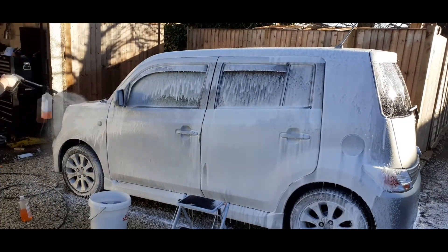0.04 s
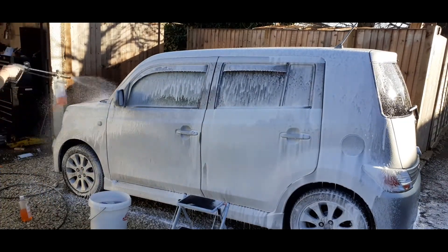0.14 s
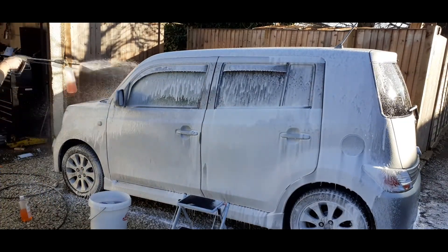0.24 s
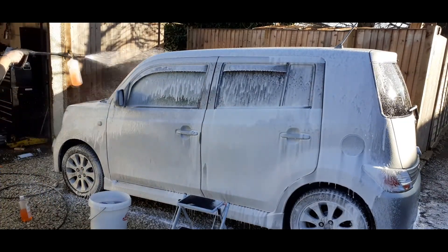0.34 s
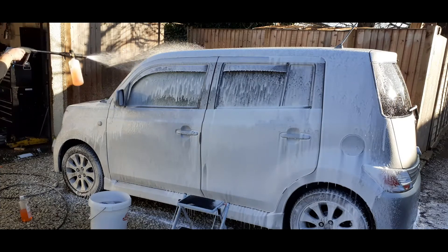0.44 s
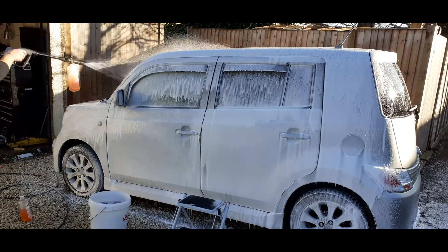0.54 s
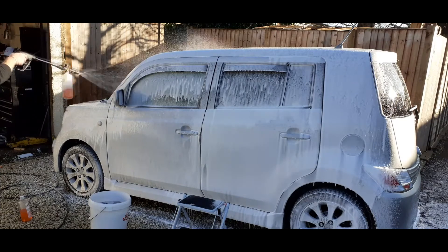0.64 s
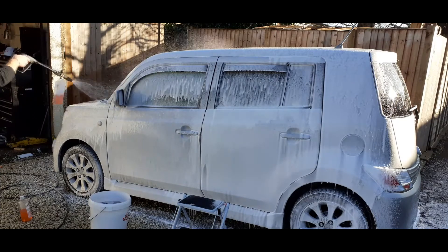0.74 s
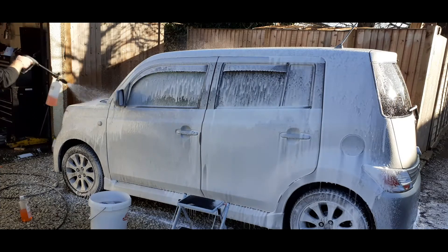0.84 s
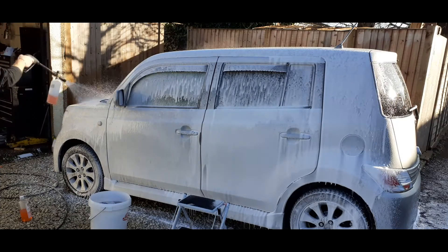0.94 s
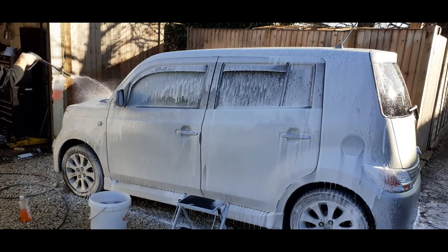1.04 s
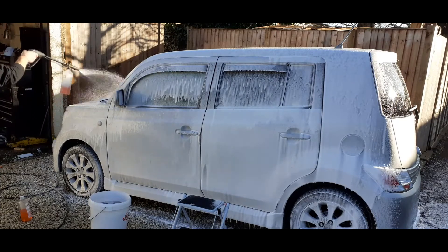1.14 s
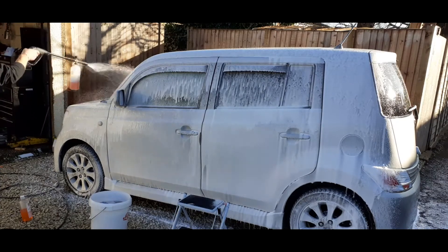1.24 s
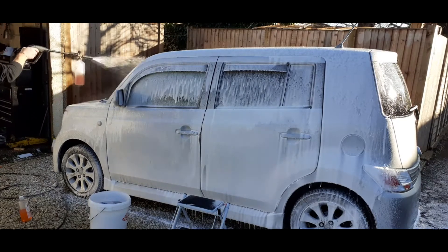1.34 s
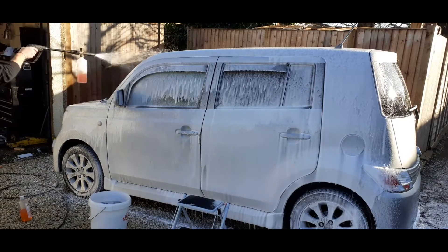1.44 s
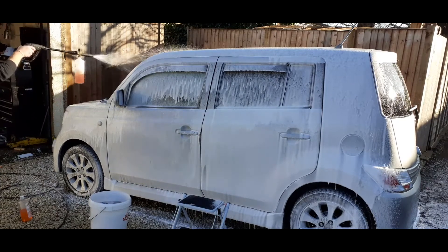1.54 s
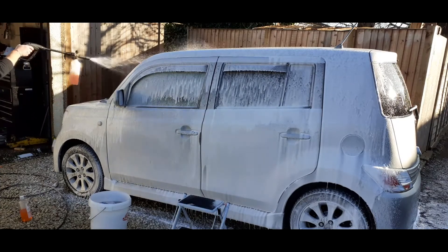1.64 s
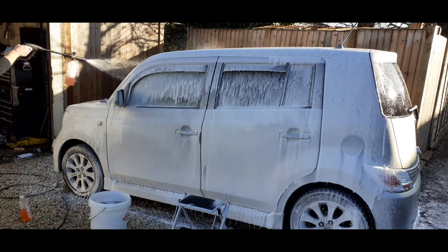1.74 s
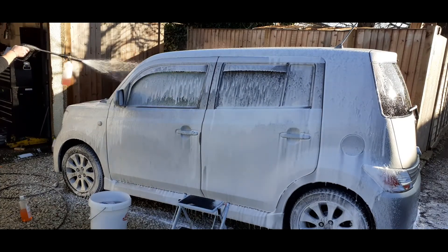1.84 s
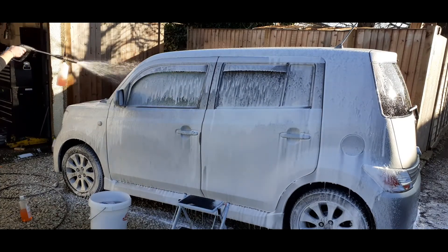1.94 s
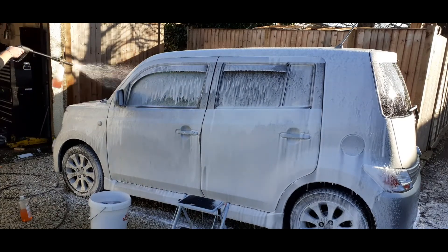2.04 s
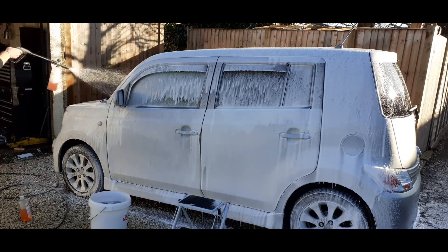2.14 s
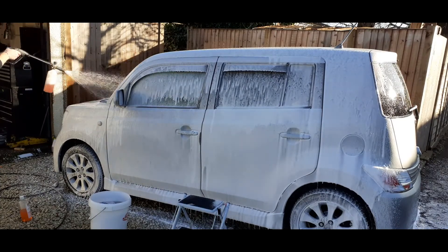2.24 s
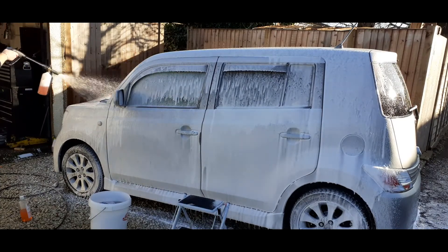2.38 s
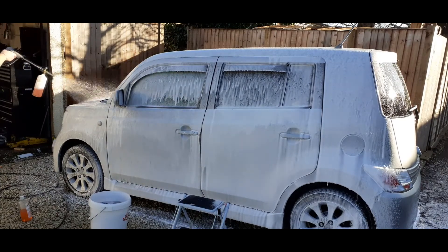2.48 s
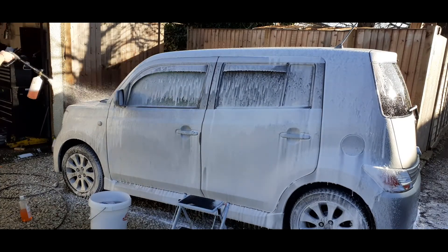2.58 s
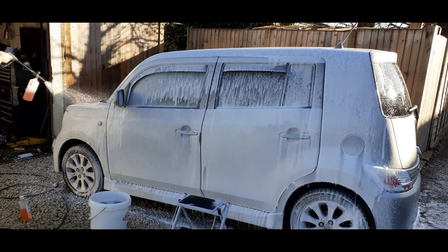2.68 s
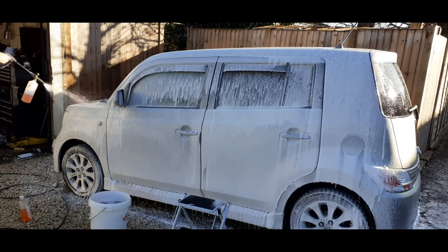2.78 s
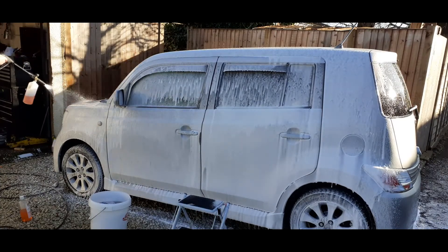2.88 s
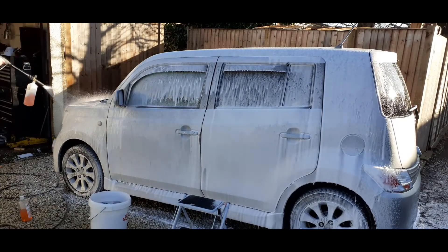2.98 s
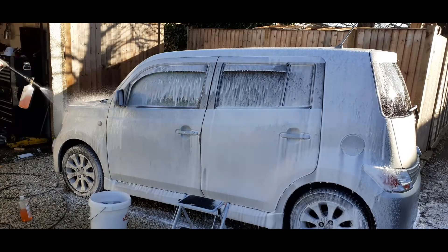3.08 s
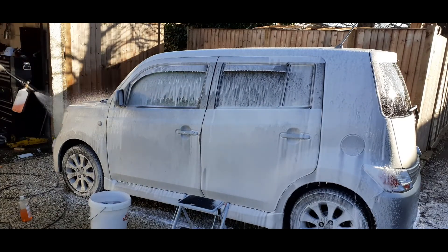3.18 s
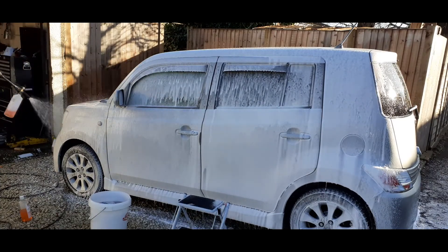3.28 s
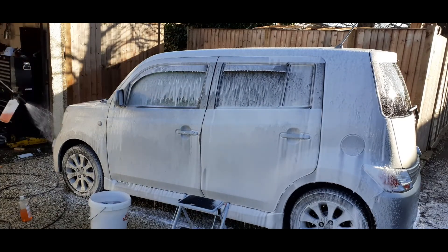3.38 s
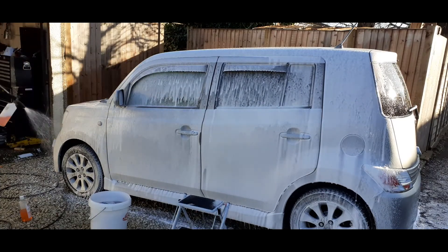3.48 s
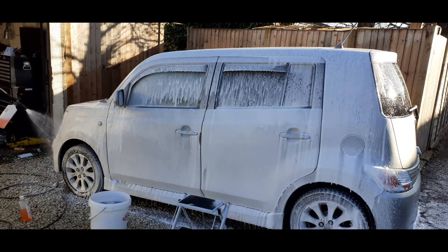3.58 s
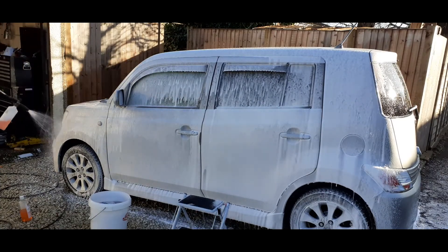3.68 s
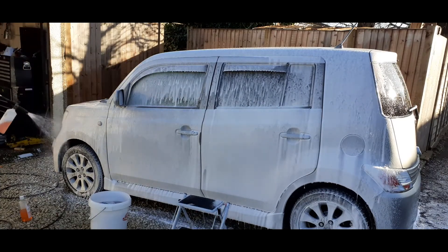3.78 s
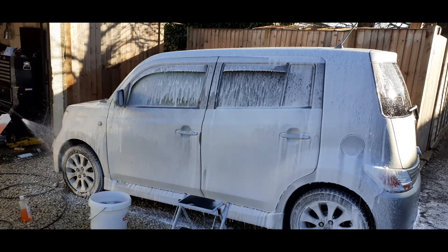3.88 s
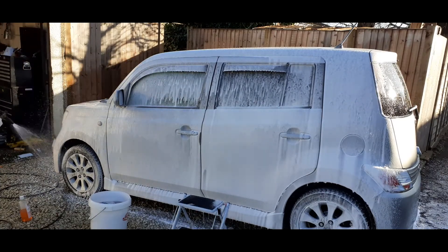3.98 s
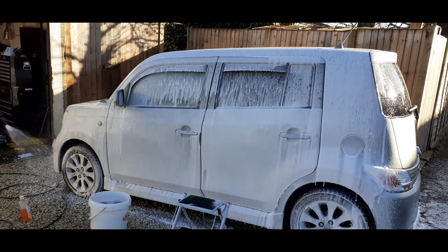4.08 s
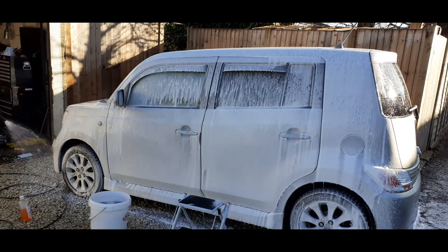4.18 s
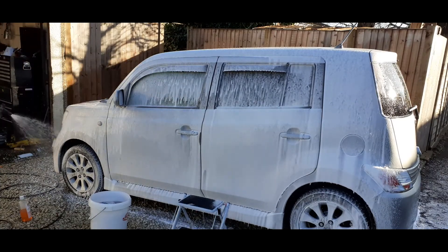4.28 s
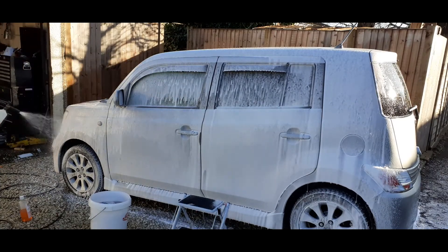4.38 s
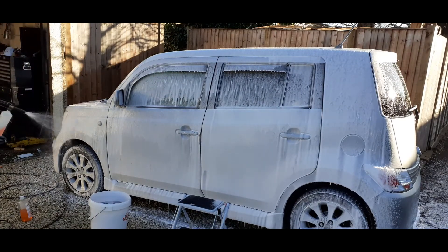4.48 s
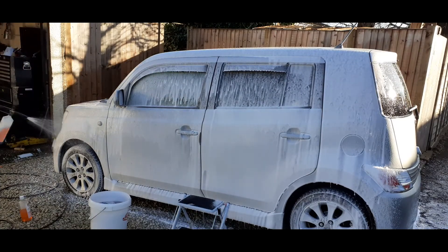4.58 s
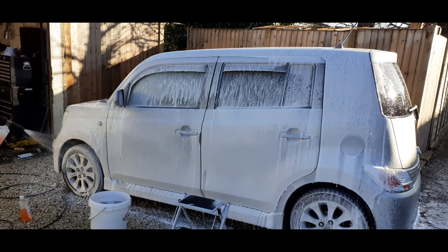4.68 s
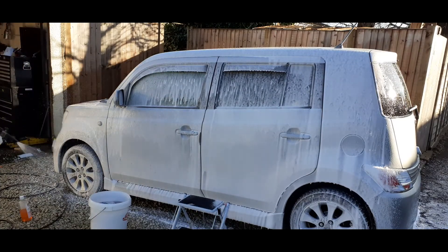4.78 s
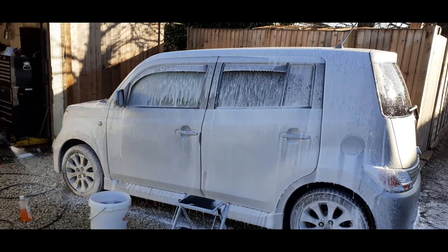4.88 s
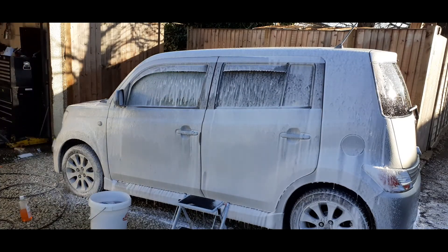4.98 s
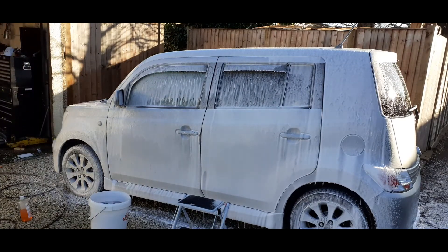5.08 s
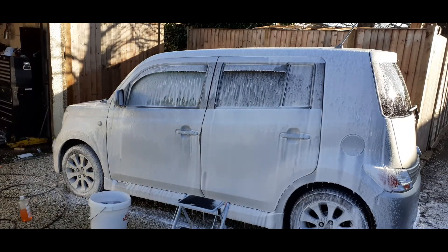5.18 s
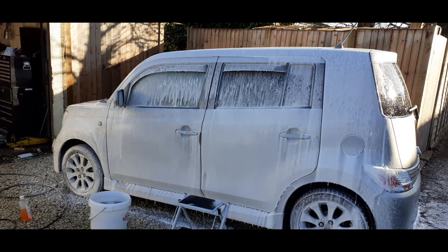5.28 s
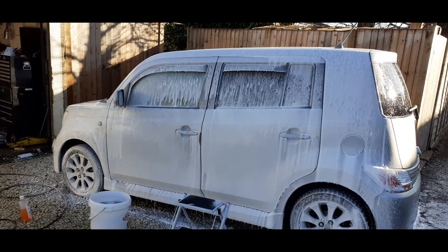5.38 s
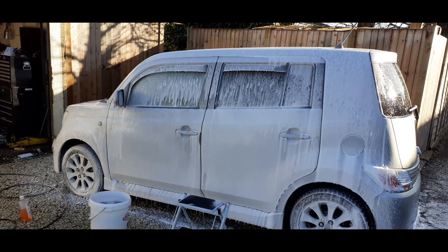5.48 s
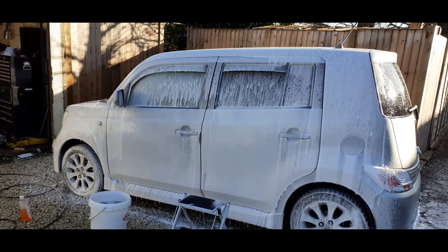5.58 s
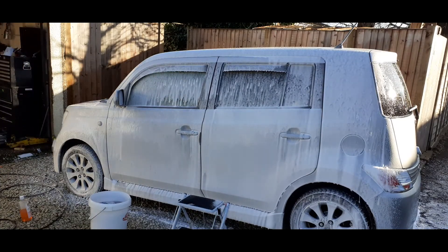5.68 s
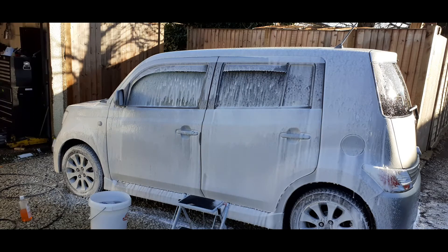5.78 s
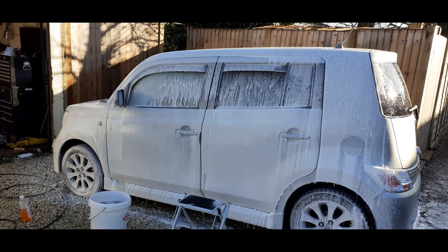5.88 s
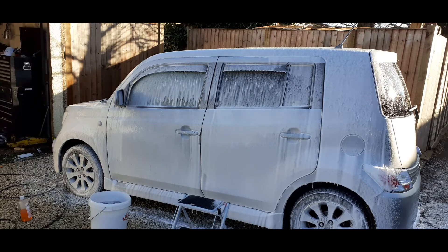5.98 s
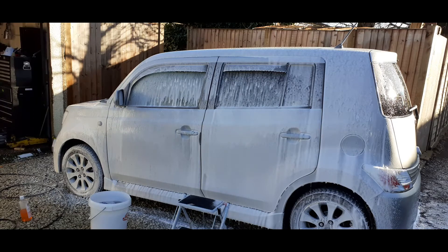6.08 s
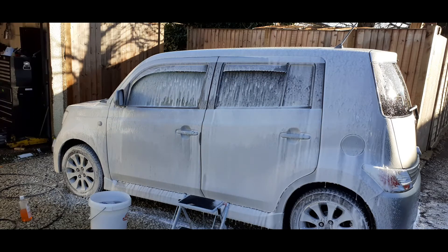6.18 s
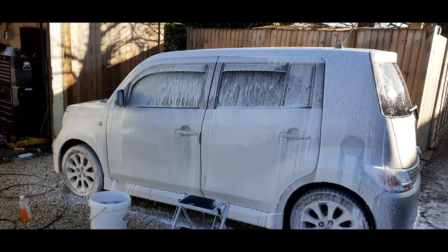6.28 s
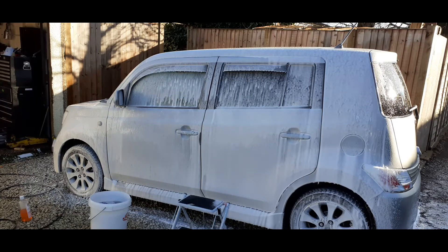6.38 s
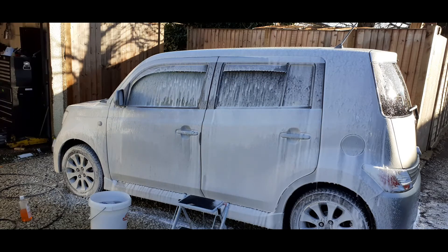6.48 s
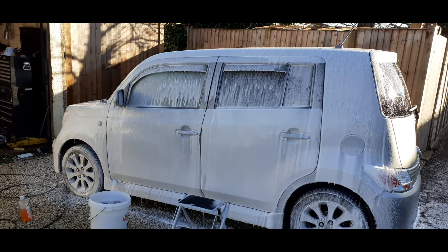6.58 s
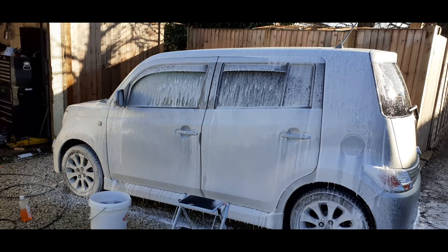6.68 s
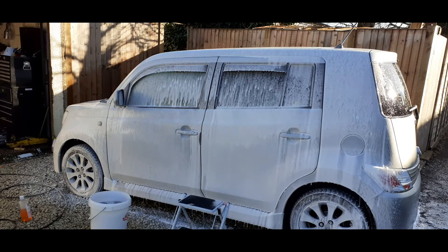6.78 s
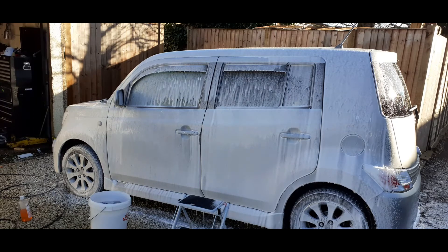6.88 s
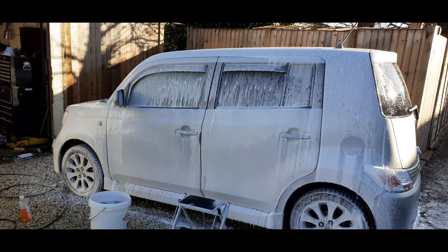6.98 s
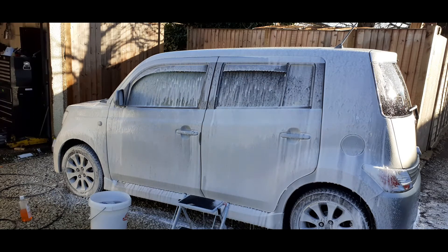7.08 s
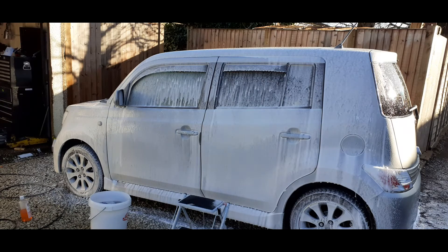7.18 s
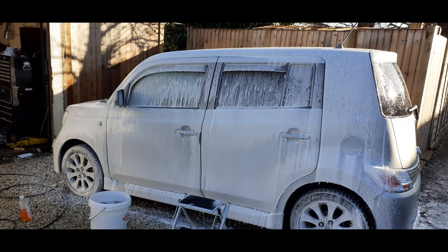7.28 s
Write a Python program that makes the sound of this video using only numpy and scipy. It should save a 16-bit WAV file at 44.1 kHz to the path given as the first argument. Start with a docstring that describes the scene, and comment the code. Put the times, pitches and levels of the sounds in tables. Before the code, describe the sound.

A foam jet rushes and sizzles against a car, drops drumming on the metal over the throbbing hum of a pressure washer. The hiss shifts in tone as the spray moves about. Then the pump stops with a soft thud and the hose empties with a brief falling whistle. In the quiet yard, feet scuff gravel and the spray wand clacks over a low breeze and far-off town wash, all heard a little left of the microphone.

```python
"""Pressure washing a car

In a fenced yard a pump drones while a jet of foam hisses and drums on a car's panels.
The trigger is let go, the motor stops and the last pressure leaves with a sinking whistle.
That leaves a distant town, a little wind, scuffs on gravel and clacks from the lance (the spray wand)."""
import sys
import numpy as np
from scipy import signal
from scipy.fft import rfft, irfft, next_fast_len
from scipy.io import wavfile

SR = 44100
rng = np.random.default_rng(int(sys.argv[2]) if len(sys.argv) > 2 else 0)


def dump(signal):
    """Clip the signal to [-1, 1] and save it as 16-bit WAV at the path in sys.argv[1]."""
    limited = np.clip(np.atleast_2d(signal).T, -1, 1)
    pcm = np.round(limited * 32767).astype(np.int16)
    wavfile.write(sys.argv[1], SR, pcm)


N = 323234
T = np.arange(N) / SR
FFT_SIZE = next_fast_len(N, True)
HZ = np.maximum(np.arange(FFT_SIZE // 2 + 1) * SR / FFT_SIZE, 1)

RELEASE_S, COLLAPSE_DB_PER_S = 4.95, 120  # the trigger is let go and the jet collapses
EMPTYING_S = 5.11  # the hose starts to empty through the nozzle
DRY_S, DRY_DB_PER_S = 5.493, 111  # the hose runs dry
UNSTEADY_HZ = 6.1  # how quickly the flow wavers
EAR_LAG_S = 0.00018  # sound from the left reaches the right ear this much later

# The jet's middle rush, high hiss and top sizzle. Columns: pitch_hz, relative_db
RUSH_SPECTRUM = [(700, -16), (1200, -8), (1500, -5), (1900, -0.5), (2250, -1), (2650, -2.5), (3200, -4),
                 (4500, -66)]
HISS_SPECTRUM = [(1800, -28.5), (2700, -10), (3300, 0), (4300, -0.5), (5200, 0.5), (6100, 1), (7200, -0.5),
                 (8200, -5.5), (9100, -12), (11000, -8), (15500, -51)]
SIZZLE_SPECTRUM = [(5500, -24), (7500, 2), (8300, 0.5), (9200, -7.5), (10500, -2), (12500, 1), (14000, 0.5),
                   (15800, -5.5)]

def spray():
    """The jet rushes and hisses, and sizzles most when the nozzle faces the listener."""
    rush_gain = jet_gain(full_db=-35.5, facing_share=0.07, emptying_db=-48.5, waver_db=1.5)
    rush = reflect(noise(RUSH_SPECTRUM), delay_s=0.002655, sway=0.057, strength=0.76)
    hiss = coloured(white() + 0.32 * clicks(per_s=3000, spread_db=3), from_db(at_hz(HISS_SPECTRUM)))
    # The hiss bounces off both the bonnet and the ground.
    hiss = reflect(hiss, delay_s=0.001092, sway=0.1555, strength=0.39)
    hiss_gain = jet_gain(full_db=-30.5, facing_share=0.0664, emptying_db=-40.5, waver_db=0.6)
    hiss = reflect(hiss, delay_s=0.0035, sway=0.0532, strength=0.74)
    sizzle_gain = jet_gain(full_db=-38.5, facing_share=1, emptying_db=-45, waver_db=0.7)
    sizzle = reflect(noise(SIZZLE_SPECTRUM), delay_s=0.0038, sway=0.0304, strength=0.51)
    return rush_gain * rush * pan(2.2) + hiss_gain * hiss * pan(2.6) + sizzle_gain * sizzle * pan(3.2)


# The jet grows louder towards the front of the car. Columns: time_s, boost_db
NEARNESS = [(0, -1.1), (.75, -1.3), (1.5, -.9), (2.25, -1.35), (3.0, 0.1), (3.55, 0.4), (4.25, 0.75),
            (4.55, 0.9), (4.95, 0.3)]
# The wrist turns the nozzle to face the listener. Columns: start_s, end_s, turn_s, boost_db
NOZZLE_SWINGS = [(-.1, 0.106, .1, 8), (0.343, .6, .2, 10), (.74, 1.01, .12, 4.5), (2.87, 3.103, .12, 4.5),
                 (3.616, 4.037, 0.19, 9), (4.357, 4.68, 0.14, 8.5), (4.737, 5.1, 0.23, 8)]

def jet_gain(full_db, facing_share, emptying_db, waver_db):
    """The jet's loudness follows its place and aim, collapses, then returns as the hose empties."""
    near_db, = in_time(NEARNESS)
    facing_db = sum(db * (rise(start - turn / 2, turn) - rise(end - turn / 2, turn))
                    for start, end, turn, db in NOZZLE_SWINGS)
    pumped = from_db(full_db + near_db + facing_share * facing_db) * fall(RELEASE_S, COLLAPSE_DB_PER_S)
    spit_db = 3.3 * swell(5.55, 0.053)  # the last water leaves in one spit
    draining = rise(EMPTYING_S, 0.031) * fall(EMPTYING_S, db_per_s=25) * fall(DRY_S, DRY_DB_PER_S)
    emptying = from_db(emptying_db + spit_db) * draining
    return from_db(waver_db * drift(UNSTEADY_HZ)) * np.hypot(pumped, emptying)


# Ringing in the panels, rush and hiss. Columns: pitch_hz, level_db, wander_share (of the pitch)
WANDERING_BANDS = [(860.4, -44, .1), (1906, -46.5, .025), (6034, -44.5, .05)]
# The jet crosses an edge or hollow of the car. Columns: middle_s, length_s, pitch_hz, level_db
FLARES = [(0.173, 0.34, 1887, -35.5), (.17, 0.12, 991, -38), (.28, 0.59, 3220, -41.5), (.3, .25, 6900, -38),
          (0.306, .22, 11300, -38), (.42, 0.52, 883, -40.5), (0.757, 0.48, 741, -37),
          (0.67, 0.42, 2070, -38), (0.915, 0.44, 1940, -40), (1.283, 0.22, 3400, -40.5),
          (1.56, 0.23, 3250, -43.5), (1.74, 0.49, 6550, -37), (1.945, 0.59, 1877, -42),
          (2.925, 0.19, 1985, -37), (2.93, 0.49, 764, -39.5), (2.96, 0.65, 5910, -37.5),
          (3.498, 0.49, 5600, -37.5), (3.65, 0.37, 1810, -39.5), (4.018, 0.36, 3500, -38),
          (4.208, 0.24, 923, -39.5), (4.2, 0.38, 2066, -46.5), (4.504, 0.18, 6080, -34.5),
          (4.564, 0.22, 1866, -39), (4.7, 0.41, 4600, -40)]

def jet_resonances(wander_hz=1.2, base_width_hz=63, width_share=0.031):
    """Narrow bands sing in the spray: three wander as the lance sweeps, others flare up briefly."""
    out = 0
    for hz, db, wander in WANDERING_BANDS:
        centre_hz = hz * np.exp(wander * drift(wander_hz))
        out += from_db(db) * noise_band(centre_hz, base_width_hz + width_share * hz)
    for middle_s, length_s, hz, db in FLARES:
        out += from_db(db) * swell(middle_s, length_s) * noise_band(hz, base_width_hz + width_share * hz)
    return out * fall(RELEASE_S, COLLAPSE_DB_PER_S) * pan(3.6)


# How fast the pump's shaft spins. Columns: time_s, turns_per_s
SHAFT_SPEED = [(0, 82.04), (1.2, 82.0), (2.2, 81.82), (3.2, 82.0), (4.6, 82.2), (5.02, 82.0), (5.12, 74),
               (5.4, 30)]
# How hard the pump works. Columns: time_s, level_db, whine_boost_db
PUMP_EFFORT = [(0, -1, 3), (.5, -1.5, 2.5), (1.2, -0.5, 4), (2, 1, 2), (3.2, 1, 1.5), (5.0, -1, 1),
               (5.07, -7.5, 4.5), (5.2, -14, -4), (5.5, -70, -10)]
# The tones of the drone. Columns: cycles_per_turn, level_db, throb_depth (0 to 1)
PUMP_TONES = [(2, -53, 0.22), (3, -45, 0.53), (4, -42.5, 0.6), (5, -47, 0.64), (6, -40.5, 0.1),
              (7, -45.5, 1), (8, -44, 0.44), (9, -44.5, 0.17), (12, -50, 0.13), (14, -53.5, 0.18),
              (17, -54.5, 0.5), (18, -51.5, 0.55), (19, -56, .2), (20, -40, 0.11), (23, -43.5, 0.36),
              (26, -43, 0.1), (28, -68, .2), (29, -41.5, 0.8), (30, -63, 0.4), (31, -85.5, .2),
              (32, -75.5, .2), (39, -45, 0), (45, -42, 0)]
# Where the pump's casing rings. Columns: pitch_hz, width_hz, relative_db
CASING_RESONANCES = [(287, 7.3, 5.5), (430, 290, -3), (680, 270, 0.5), (980, 156, 5), (1730, 530, -1.5),
                     (1940, 190, -1)]

def pump(hum_waver_db=1.5, whine_waver_db=2.0, throb_hz=6.5, rattle_db=-38):
    """The shaft's tones throb with the load, and three pistons rattle the casing on every turn."""
    turns_per_s, = in_time(SHAFT_SPEED)
    effort_db, whine_db = in_time(PUMP_EFFORT)
    angle = 2 * np.pi * np.cumsum(turns_per_s * (1 + 0.0003 * drift(4))) / SR
    beat = np.exp(1j * (2 * np.pi * throb_hz * T + 0.5 * drift(0.73)))
    tones = 0
    for multiple, level_db, depth in PUMP_TONES:
        tone_phase, beat_phase = np.exp(2j * np.pi * rng.random(2))
        # A tone throbs by beating against a neighbour just above it.
        throb = (1 + depth * beat_phase * beat) / np.hypot(1, depth)
        wave = tone_phase * np.exp(1j * multiple * angle) * throb
        wander_db = hum_waver_db * drift(2.1) if multiple < 10 else whine_db + whine_waver_db * drift(3.7)
        tones += stereo_tone(from_db(level_db + wander_db) * wave, multiple * turns_per_s[0])
    pistons = 1 + 0.57 * np.cos(3 * angle) + 0.34 * np.cos(angle)
    casing_power = sum((from_db(db) / (1 + (2 * (HZ - hz) / width) ** 2) ** 1.13) ** 2
                       for hz, width, db in CASING_RESONANCES)
    rattle = from_db(rattle_db) * coloured(white() * pistons, np.sqrt(casing_power))
    return from_db(effort_db) * (tones * pan(4.5) + rattle * pan(1.2))


# The car's panels under the drops. Columns: pitch_hz, relative_db
PANEL_SPECTRUM = [(100, -59), (200, -4.5), (330, -7.5), (550, -10), (780, 3), (1000, -9.5), (1250, -4),
                  (1800, -16.5)]

def foam_landing(drum_db=-39.5, near_share=0.38, waver_db=1.1, patter_db=-47.5):
    """Drops drum on the panels and patter on the bonnet; the last land after the jet has stopped."""
    near_db, = in_time(NEARNESS)
    landing = rise(0.018, 0.085) * fall(EMPTYING_S, db_per_s=23) * fall(DRY_S, DRY_DB_PER_S)
    drum = coloured(clicks(per_s=2500, spread_db=2.3), from_db(at_hz(PANEL_SPECTRUM)))
    drum = reflect(drum, delay_s=0.0037, sway=0.083, strength=0.26)
    drum *= from_db(drum_db + near_share * near_db + waver_db * drift(UNSTEADY_HZ))
    patter = from_db(patter_db) * rise(0.9, 2.4) * noise_band(1230.5, width_hz=133)
    return landing * (drum + patter) * pan(3.2)


# The nozzle's sinking whistle. Columns: time_s, pitch_hz, level_db
NOZZLE_WHISTLE = [(5.11, 3264, -50), (5.15, 3230, -37), (5.22, 3000, -41), (5.25, 2994, -31.5),
                  (5.32, 2850, -41), (5.49, 2690, -53), (5.54, 2800, -49.5), (5.6, 2800, -63),
                  (5.75, 2850, -88)]
# The tones in that whistle. Columns: pitch_multiple, relative_db
WHISTLE_OVERTONES = [(1, 1), (1.498, -17), (2.019, -19), (2.57, -17), (4, -20)]

def nozzle_whistle():
    """As the pressure falls, the nozzle whistles and breaks up into a band of hiss."""
    hz, level_db = in_time(NOZZLE_WHISTLE)
    clear = whistle(NOZZLE_WHISTLE, WHISTLE_OVERTONES, jitter=0.028, flutter_db=2)
    breakup_db = np.interp(T, [5.25, 5.4], [-8, 0])
    airy = from_db(level_db + breakup_db) * noise_band(hz, width_hz=160) * pan(4.1)
    return (T > EMPTYING_S) * (clear + airy)


# The valve's thin squeal. Columns: time_s, pitch_hz, level_db
VALVE_SQUEAL = [(5.45, 5910, -110), (5.6, 5910, -75), (5.8, 5910, -74.5), (6.1, 5905, -81),
                (6.45, 5905, -105)]

def closed_valve(seep_db=-71):
    """The closed valve squeals and seeps faintly for a moment."""
    squeal = whistle(VALVE_SQUEAL, [(1, 0)], jitter=0.004, flutter_db=2.5)
    seep_gain = from_db(seep_db) * rise(DRY_S, 0.1) * fall(5.77, db_per_s=45)
    return squeal + seep_gain * noise_band(4400, width_hz=630) * pan(3)


# The pump stopping, then footfalls. Columns: start_s, pitch_hz, level_db, ring_s (to fade by 60 dB)
THUDS = [(5.041, 129.3, -29, 0.09), (5.055, 658, -34.5, 0.31), (6.57, 91.5, -39, 0.11),
         (6.712, 84, -53, .15), (6.716, 216, -34.5, 0.063)]

def thuds(attack_s=0.0045):
    """Each dull thud is one low tone that dies away quickly."""
    out = np.zeros((2, N))
    for start_s, hz, db, ring_s in THUDS:
        start = round(start_s * SR)
        age = T[:N - start]
        gain = from_db(db - 60 * age / ring_s) * (1 - np.exp(-age / attack_s))
        out[:, start:] += gain * stereo_tone(np.exp(2j * np.pi * hz * age), hz)
    return out * pan(5.7)


# Knocks on the lance. Columns: start_s, level_db, low_tone_boost_db, favoured_pitch_hz
KNOCKS = [(6.2965, -52.5, 12, 1470), (7.1217, -32.5, -13, 4180), (7.1249, -46, 17, 1070),
          (7.257, -38, -7, 3660), (7.283, -42, 4, 704), (7.309, -40, -4, 8100)]
# The tones the lance rings with. Columns: pitch_hz, relative_db, ring_s (to fade by 60 dB)
LANCE_TONES = [(495, -4.5, 0.069), (704, -7, .11), (1070, -9, 0.03), (1280, -13, 0.03), (1470, -14, 0.1),
               (3660, -13, 0.015), (4180, -10, 0.015), (5170, -25, 0.018), (8100, -6, .015),
               (11200, -11, .015)]
# The crack of a knock. Columns: pitch_hz, relative_db
CRACK_SPECTRUM = [(300, -2), (1100, 11), (2500, -1), (4300, -1), (6500, -4), (8200, 0), (9500, -7),
                  (12000, -8), (15500, -13)]

def lance_clacks(tick_s=0.0014, crack_db=-11, crack_s=0.027, favour_db=7):
    """Each knock ticks, cracks and rings the lance, giving one of its tones an extra push."""
    out = np.zeros((2, N))
    crack = noise(CRACK_SPECTRUM)
    for start_s, db, low_boost_db, favoured_hz in KNOCKS:
        start = round(start_s * SR)
        age = T[:N - start]
        burst = np.exp(-age / tick_s) + from_db(crack_db) * np.exp(-age / crack_s)
        out[:, start:] += from_db(db) * burst * crack[:, start:]
        favoured = np.argmin([abs(hz - favoured_hz) for hz, _, _ in LANCE_TONES])
        for k, (hz, tone_db, ring_s) in enumerate(LANCE_TONES):
            boost_db = low_boost_db * (hz < 2000) + favour_db * (k == favoured)
            strength_db = db + tone_db + boost_db + rng.normal(0, 1.8, (2, 1))
            wave = np.sin(2 * np.pi * hz * age) * rng.choice([-1, 1])
            out[:, start:] += from_db(strength_db - 60 * age / ring_s) * wave
    return out * pan(3)


# Feet and hose scrape the gravel. Columns: start_s, level_db, fade_s
SCUFFS = [(6.293, -49, 0.034), (6.486, -59, 0.039), (6.521, -51, 0.03), (6.575, -61, 0.043),
          (6.705, -51, 0.027), (6.81, -76, 0.032), (6.87, -77, .04), (7.063, -58, 0.2), (7.216, -54, .03),
          (7.258, -38, 0.033), (7.302, -47, 0.017)]
# The clicking stones. Columns: pitch_hz, relative_db
GRAVEL_SPECTRUM = [(400, 6), (900, 5), (1500, -11), (2400, -2), (3600, 4), (5000, -8), (6500, -11),
                   (8200, -10), (9400, -22), (12000, -15), (15500, -19)]

def gravel_scuffs():
    """Each scuff is a short, dying shower of stone clicks."""
    gain = sum(from_db(db) * (T >= start_s) * np.exp(-np.maximum(T - start_s, 0) / fade_s)
               for start_s, db, fade_s in SCUFFS)
    stones = coloured(clicks(per_s=2500, spread_db=2.5), from_db(at_hz(GRAVEL_SPECTRUM)))
    return gain * stones * pan(3.9)


# The rumble of moving air. Columns: pitch_hz, relative_db
WIND_SPECTRUM = [(20, -16), (35, -5), (52, 7), (68, 9.5), (95, 5), (130, 2), (200, -29), (400, -60)]
# Puffs of wind. Columns: middle_s, length_s, level_db
GUSTS = [(3.12, 0.57, -49.5), (6.544, 0.22, -45), (6.73, 0.23, -39.5), (7.12, 0.51, -47)]

def wind(breeze_db=-52.5):
    """A low breeze wavers, and a few gusts blow mostly on the left."""
    breeze = from_db(breeze_db + drift(3.3)) * noise(WIND_SPECTRUM)
    gust_gain = sum(from_db(db) * swell(middle_s, length_s) for middle_s, length_s, db in GUSTS)
    return breeze * pan(2.9) + gust_gain * noise(WIND_SPECTRUM) * pan(10.3)


# The town's murmur. Columns: pitch_hz, relative_db
TOWN_SPECTRUM = [(88, -16), (150, -5), (213, -7), (388, -9), (570, -4), (860, -3), (1300, -12), (2000, -18),
                 (3500, -32.5), (5400, -37), (7500, -41.5), (9500, -49), (12000, -37), (15500, -38)]
# How loud the town is. Columns: time_s, level_db
TOWN_LEVEL = [(0, -49.5), (5.3, -44.5), (5.75, -49), (6.15, -49.5), (6.45, -45.5), (7.05, -45), (7.33, -44)]

def distant_town():
    """The town blurs into a wash of noise, further to the left than the washer."""
    level_db, = in_time(TOWN_LEVEL)
    return from_db(level_db) * noise(TOWN_SPECTRUM, lag_s=0.00029) * pan(2.8)


# How alike the two ears hear the yard. Columns: pitch_hz, likeness (0 to 1)
EAR_LIKENESS = [(30, 1), (130, 0.81), (300, 0.67), (600, 0.73), (1200, 0.34), (2500, 0.057), (5000, 0.082),
                (15000, 0.13)]

def coloured(source, gain, lag_s=EAR_LAG_S):
    """Filter three noises into stereo: one reaches both ears directly, two are scattered sound."""
    direct, left, right = rfft(source, FFT_SIZE)
    alike = np.clip(at_hz(EAR_LIKENESS), 0, 1)
    arrival = np.exp(-2j * np.pi * HZ * lag_s * np.array([[0], [1]]))
    both = np.sqrt(alike) * direct * arrival + np.sqrt(1 - alike) * np.array([left, right])
    return rms_one(irfft(both * gain, FFT_SIZE)[:, :N])


def noise(spectrum, lag_s=EAR_LAG_S):
    """Smooth stereo noise; its spectrum says how strong each pitch is."""
    return coloured(white(), from_db(at_hz(spectrum)), lag_s)


def white():
    """Three unrelated noises: one for both ears to share, and one for each."""
    return rng.standard_normal((3, N))


def clicks(per_s, spread_db):
    """Three unrelated showers of clicks of uneven size."""
    sizes = from_db(spread_db * np.minimum(rng.exponential(1, (3, N)), 5))
    showers = white() * sizes * (rng.random((3, N)) < per_s / SR)
    return showers / (showers.std() + 1e-12)


def noise_band(hz, width_hz):
    """Swirling flow makes a narrow band of noise around a pitch that may glide."""
    carrier = np.exp(2j * np.pi * np.cumsum(hz * np.ones(N)) / SR)
    ears = [(carrier * (drift(width_hz) + 1j * drift(width_hz))).real for _ in range(2)]
    return rms_one(np.array(ears))


def whistle(curve, overtones, jitter, flutter_db):
    """An airy whistle: each tone trembles in pitch and flutters in level."""
    hz, level_db = in_time(curve)
    out = 0
    for multiple, overtone_db in overtones:
        wave = np.exp(2j * np.pi * np.cumsum(multiple * hz * (1 + jitter * drift(198))) / SR)
        wave *= from_db(flutter_db * drift(60))
        # Reflections put the two ears out of step.
        out += from_db(overtone_db) * rms_one(np.array([wave.real, wave.imag]))
    return from_db(level_db) * out * pan(3.8)


def stereo_tone(wave, hz):
    """Turn a complex wave into a tone that reaches the right ear later."""
    return np.sqrt(2) * np.array([wave.real, (wave * np.exp(-2j * np.pi * hz * EAR_LAG_S)).real])


def reflect(sound, delay_s, sway, strength):
    """A close echo boosts some pitches and cancels others; its delay shifts as the lance sweeps."""
    now = np.arange(N)
    echo = [np.interp(now - SR * delay_s * np.exp(sway * drift(1.4)), now, side) for side in sound]
    return rms_one(sound + strength * np.array(echo))


def drift(rate_hz):
    """A smooth random wobble with a typical size of 1."""
    step, warm_up = 40, 2000
    pole = np.exp(-2 * np.pi * step * rate_hz / SR)
    jolts = rng.standard_normal(N // step + warm_up + 2)
    slow = signal.lfilter([1], [1, -2 * pole, pole * pole], jolts)[warm_up:]
    return np.interp(np.arange(N) / step, np.arange(len(slow)), rms_one(slow))


def swell(middle_s, length_s):
    """A smooth bump of height 1 around a moment."""
    return np.exp(-(np.e * (T - middle_s) / length_s) ** 2)


def rise(start_s, length_s):
    """Go smoothly from 0 to 1."""
    return np.sin(np.pi / 2 * np.clip((T - start_s) / length_s, 0, 1)) ** 2


def fall(start_s, db_per_s):
    """Hold at 1, then die away."""
    return from_db(-db_per_s * np.maximum(T - start_s, 0))


def in_time(rows):
    """Join a table's points into one curve over time for each value column."""
    times_s, *columns = np.transpose(rows)
    return [np.interp(T, times_s, column) for column in columns]


def at_hz(points):
    """Join a table's points into a curve over pitch."""
    hz, value = np.transpose(points)
    return np.interp(np.log(HZ), np.log(hz), value)


def pan(left_db):
    """Gains that make the left side this much louder than the right."""
    return from_db(np.array([[left_db], [-left_db]]) / 2)


def from_db(db):
    """Turn decibels into a gain to multiply by."""
    return np.exp(np.asarray(db) * (np.log(10) / 20))


def rms_one(x):
    """Scale so that the average of the channels has a typical size (rms) of 1."""
    return x / np.sqrt(np.mean(np.atleast_2d(x).mean(axis=0) ** 2) + 1e-20)


def scene():
    """Add up the washer, the handling noises and the yard."""
    washer = pump() + spray() + foam_landing() + jet_resonances() + nozzle_whistle() + closed_valve()
    return washer + thuds() + gravel_scuffs() + lance_clacks() + wind() + distant_town()


def record(dry, low_cut_hz=36, high_cut_hz=15850):
    """Drop the lowest rumble and cut the highest treble steeply."""
    thinned = signal.sosfilt(signal.butter(4, low_cut_hz, "high", fs=SR, output="sos"), dry)
    return signal.sosfilt(signal.ellip(12, 0.1, 80, high_cut_hz, fs=SR, output="sos"), thinned)


dry = scene()
out = record(dry)
dump(out)
```